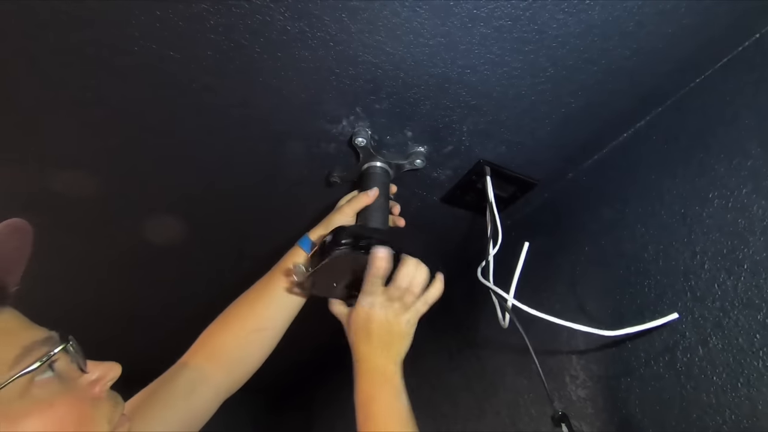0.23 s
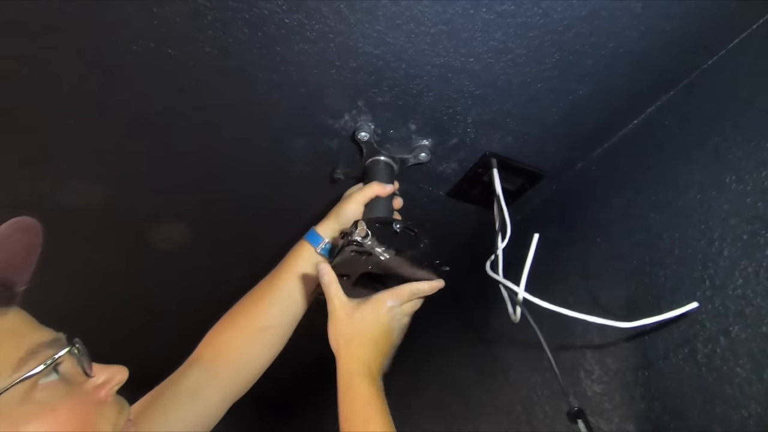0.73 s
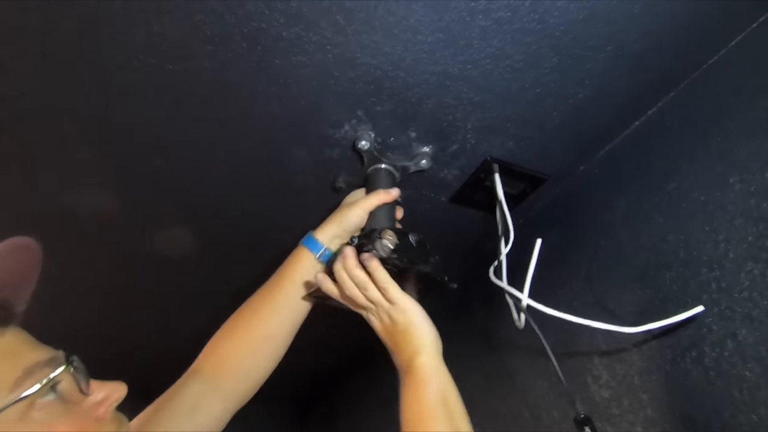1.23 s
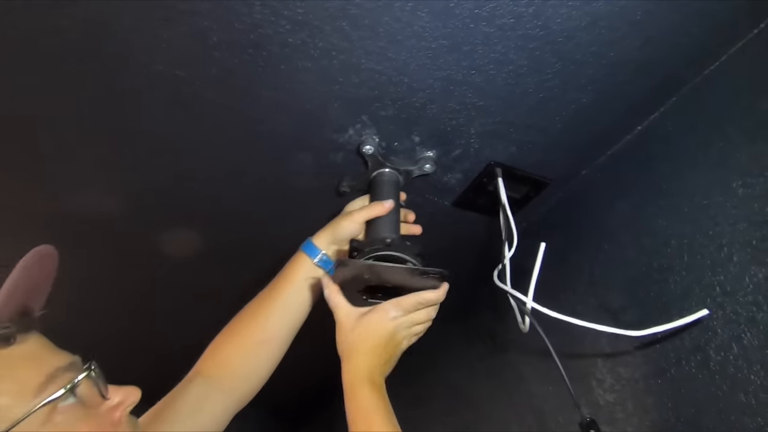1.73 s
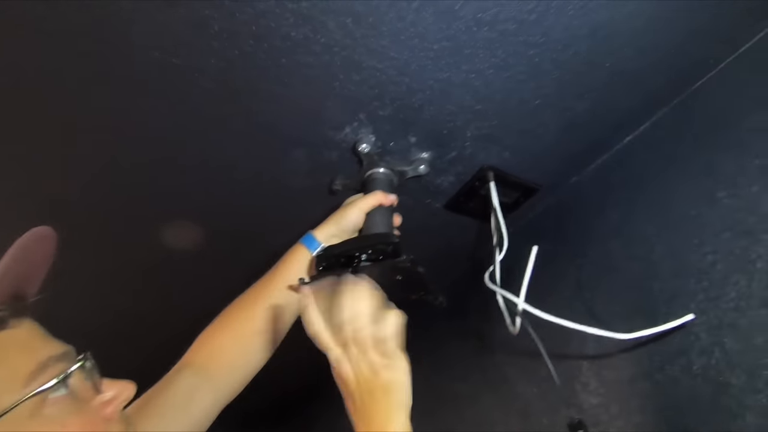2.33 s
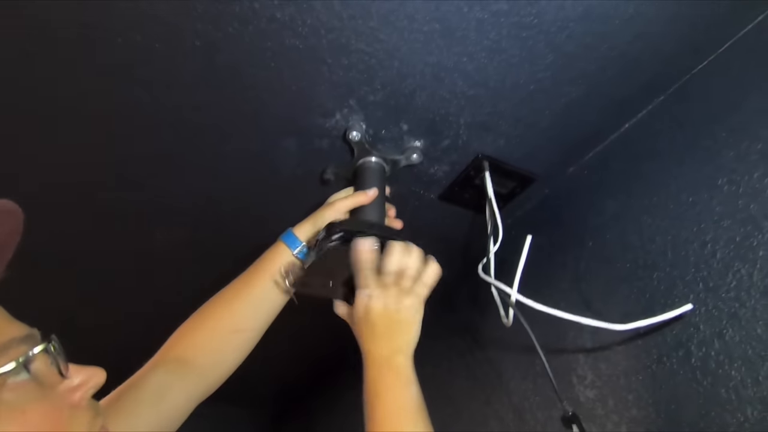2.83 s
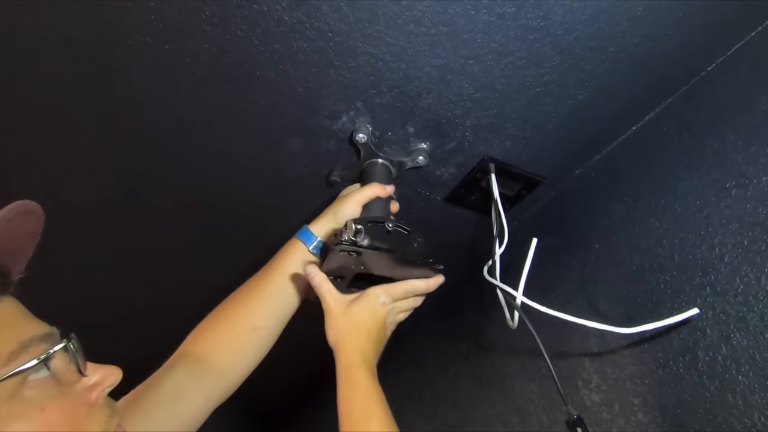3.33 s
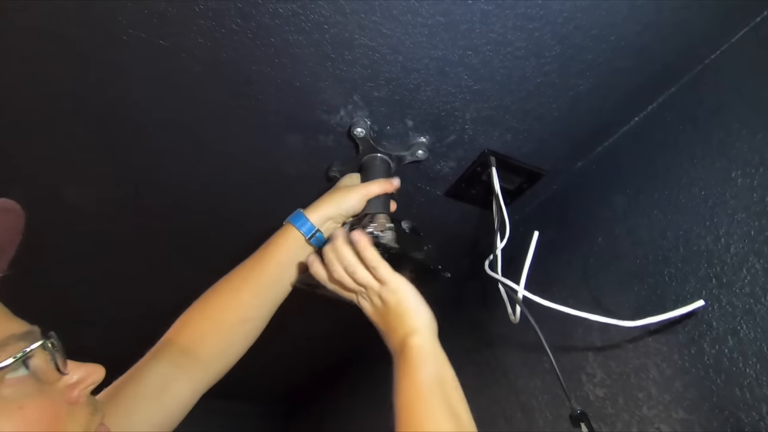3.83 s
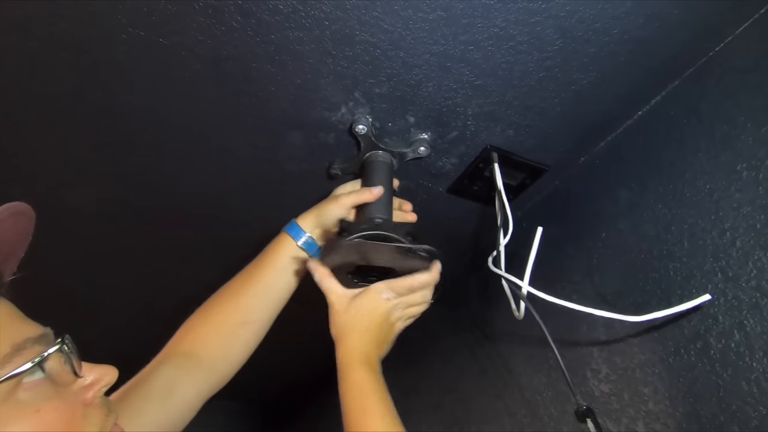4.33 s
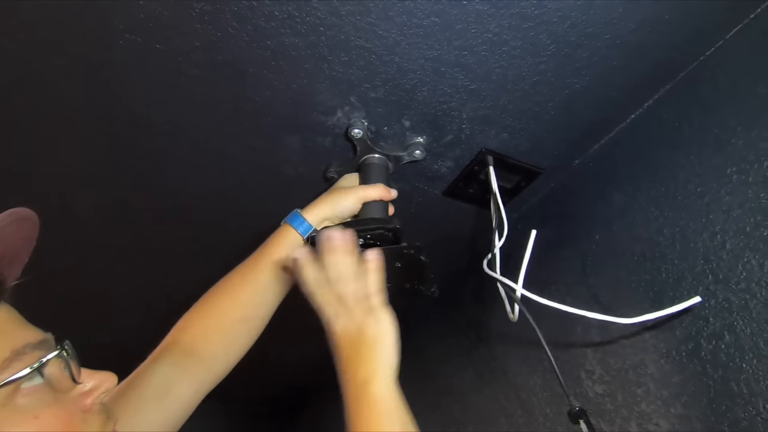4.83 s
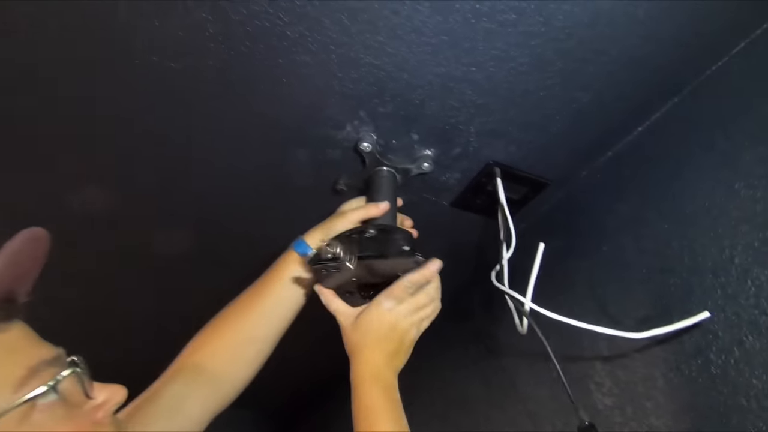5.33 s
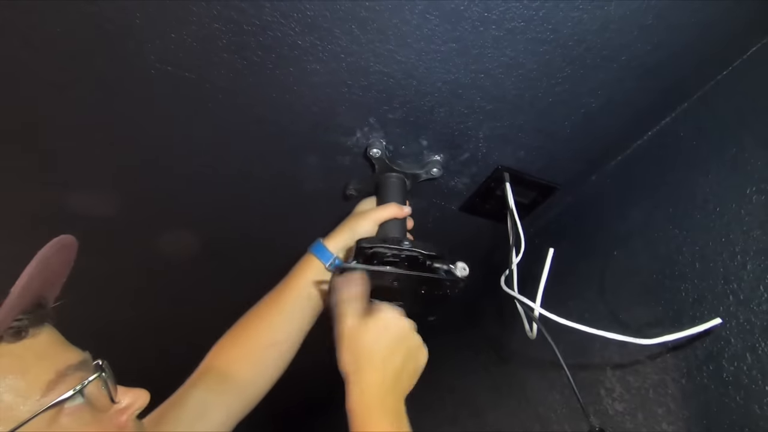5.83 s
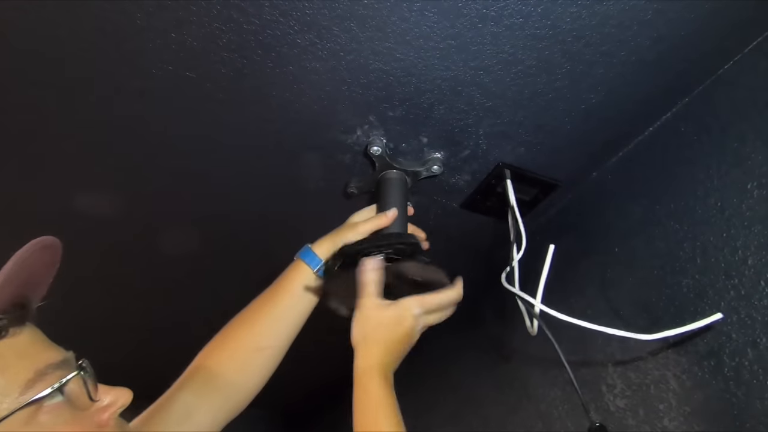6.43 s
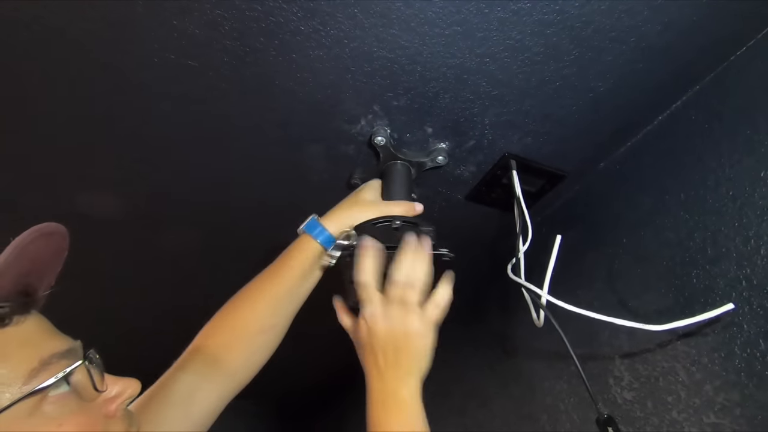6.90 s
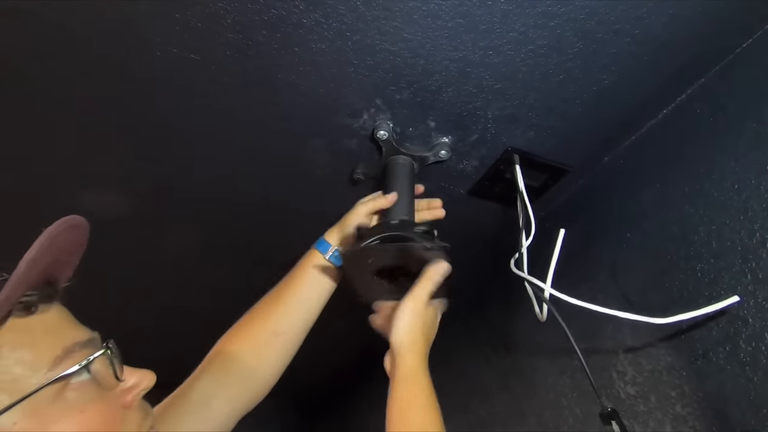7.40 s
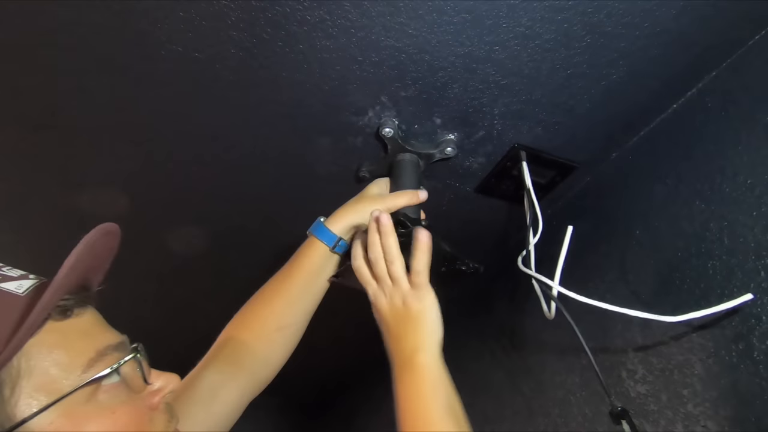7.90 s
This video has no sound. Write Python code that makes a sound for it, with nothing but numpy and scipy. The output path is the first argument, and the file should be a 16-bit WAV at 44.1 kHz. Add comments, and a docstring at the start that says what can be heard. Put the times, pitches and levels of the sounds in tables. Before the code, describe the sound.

Metal hardware is screwed on overhead by hand: sharp clacks, gritty thread grinding, dull ceiling thumps and thin tinkles over soft hiss and rumble.

```python
"""A small quiet room: hands turn a steel bracket on the thread of a pole under a ceiling plate.
The loose joint clicks and knocks: short bursts of noise ring the bracket's resonances.
Two small loose steel parts chime as fading sines. The thread slips in uneven jerks, which grind in
the bracket and boom in the ceiling; hands scrape on steel. Soft pushes thud in the ceiling.
Random echoes, a steady hiss and a deep, lumpy rumble surround it all."""
import sys
import numpy as np
from scipy import signal
from scipy.fft import rfft, irfft
from scipy.io import wavfile
from scipy.ndimage import uniform_filter1d

SR = 44100
rng = np.random.default_rng(int(sys.argv[2]) if len(sys.argv) > 2 else 0)


def digitize_waveform(pressure):
    """Quantize a signal to 16-bit integers and store it at the path in sys.argv[1].

    Rows of a 2-D input are taken as channels; values are limited to [-1, 1].
    """
    field = np.atleast_2d(pressure).T
    bounded = np.clip(field, -1, 1)
    quanta = np.round(bounded * 32767).astype(np.int16)
    wavfile.write(sys.argv[1], SR, quanta)


def nominal_scale(level):
    """Amplitude ratio for a level in decibels (scalar or array-like)."""
    x = np.asarray(level, float) / 20
    return 10 ** x


N = 359856  # length in samples, 8.16 s


def evened(x):
    """Scales to rms 1."""
    return x / np.sqrt(np.mean(x ** 2) + 1e-20)


def peaked(x, db):
    """Scales the peak to db."""
    return nominal_scale(db) * x / abs(x).max()


def read(points, hz):
    """Reads a table at any frequency, on a log-frequency axis."""
    f, value = np.transpose(points)
    return np.interp(np.log(hz + 1), np.log(f + 1), value)


def add(mix, s, sound):
    """Mixes a sound in at time s."""
    part = mix[round(s * SR):][:len(sound)]
    part += sound[:len(part)]


def band(x, lo_hz, hi_hz, order=2):
    """Keeps only the tones between two frequencies."""
    return signal.sosfilt(signal.butter(order, [lo_hz, hi_hz], "bandpass", fs=SR, output="sos"), x)


def resonate(x, hz, width):
    """Two-pole resonance: favours tones near hz, with gain 1 at its centre."""
    r = np.exp(-np.pi * width / SR)
    return signal.lfilter([(1 - r * r) / 2, 0, (r * r - 1) / 2],
                          [1, -2 * r * np.cos(2 * np.pi * hz / SR), r * r], x)


def body(x, modes):
    """A solid thing rings at several pitches at once: a sum of resonances."""
    return sum(nominal_scale(db) * resonate(x, hz, width) for hz, width, db in modes)


# colour of the hiss: f/Hz, relative level per Hz/dB
HISS_COLOUR = [(35, -36), (60, -48), (85, -6), (168, -0.5), (553, 0.5), (882, -5), (1470, -11.5),
               (1740, -11), (4530, -19), (11800, -58), (16000, -57)]
# colour of the deep rumble: f/Hz, relative level per Hz/dB
RUMBLE_COLOUR = [(2, 0), (8, -5), (20, -9), (40, -20), (55, -23), (70, -32), (100, -60)]
# loudness of the deep rumble over time: t/s, level/dB
RUMBLE_LEVEL = [(0.0, -31), (0.23, -33), (0.25, -32), (2.23, -32), (2.34, -25.5), (2.41, -32.5),
                (4.79, -38), (5.16, -37), (5.2, -27), (5.36, -32), (5.45, -35.5), (7.91, -36), (8.07, -35),
                (8.16, -47)]


def quiet():
    """Steady hiss of room and microphone over a deep, lumpy rumble; both are coloured noise."""
    hz = np.fft.rfftfreq(N, 1 / SR)
    colours = nominal_scale([read(HISS_COLOUR, hz), read(RUMBLE_COLOUR, hz)])
    hiss, rumble = irfft(rfft(rng.standard_normal((2, N))) * colours, N)
    rumble_db = np.interp(np.arange(N) / SR, *np.transpose(RUMBLE_LEVEL))
    return nominal_scale(-43.5) * evened(hiss) + nominal_scale(rumble_db) * evened(rumble)


# how long echoes take to fade by 60 dB: f/Hz, t60/s
ECHO_FADE = [(120, 0.19), (330, 0.5), (870, 0.39), (2300, 0.57), (6060, 0.49), (16000, 0.22)]


def room(x):
    """Scattered random echoes, each band dying at its own speed, in three tails taken in turn."""
    out = np.zeros(N)
    turn = np.arange(N) / SR * 2.3
    for k in range(3):
        echoes = rng.standard_normal(SR) * (rng.random(SR) < 0.12)
        hz, t, z = signal.stft(echoes, SR, nperseg=256)
        fade = nominal_scale(-60 * t / read(ECHO_FADE, hz)[:, None])
        tail = signal.istft(z * fade, SR, nperseg=256)[1]
        tail = tail * np.clip((np.arange(len(tail)) / SR - 0.003) / 0.023, 0, 1)  # echoes build up
        share = np.cos(np.pi * (turn + k / 3))
        out += signal.oaconvolve(x * share, tail / np.linalg.norm(tail))[:N]
    return out * np.sqrt(2 / 3)


# resonances of the ceiling boards: f/Hz, width/Hz, relative level/dB
CEILING_MODES = [(132, 19, 2), (149, 43, 2.5), (172.4, 14, 0), (201, 49, 1.5), (220, 67, -15),
                 (261, 49, -2.5), (308.3, 54, -0.5), (413.5, 6, 6), (494.8, 7.6, 5.5)]


def ceiling(x):
    """The ceiling boards boom at their own low pitches when shaken by x."""
    return body(x, CEILING_MODES)


# dull knocks into the ceiling: t/s, peak level/dB, f/Hz
SOFT_PUSHES = [(0.044, -19.5, 133), (0.18, -27, 323), (0.316, -24, 122), (0.8, -19.5, 203),
               (1.073, -27, 182), (1.134, -25.5, 150), (1.422, -18, 343), (1.48, -13, 329),
               (1.606, -23, 353), (1.917, -26, 157), (2.734, -26, 175), (2.805, -11.5, 172),
               (2.909, -18.5, 192), (3.391, -27, 308), (3.696, -28, 180), (3.94, -11.5, 266),
               (4.006, -22, 268), (4.061, -20.5, 287), (4.427, -21.5, 160), (5.154, -9.5, 193),
               (5.524, -17, 322), (5.735, -26, 129), (6.173, -27.5, 135), (6.411, -18, 197),
               (6.708, -29, 154), (7.037, -41, 194), (7.249, -25, 188), (7.308, -29, 142),
               (7.362, -14.5, 154), (7.618, -23, 187)]


def thuds():
    """A soft push rings the ceiling near one pitch."""
    out, t = np.zeros(N), np.arange(8192) / SR
    t60 = 0.061  # s
    swell_and_fade = nominal_scale(-60 * t / t60) * np.minimum(t / 0.005, 1)
    for s, db, hz in SOFT_PUSHES:
        ring = np.sin(2 * np.pi * hz * t) * swell_and_fade
        add(out, s, peaked(ring + 5.0 * ceiling(ring), db))
    return out


# resonances of the bracket: f/Hz, width/Hz, relative level/dB
BRACKET_MODES = [(475, 79, 3.5), (711, 160, 6.5), (875, 160, 5), (1005, 51, -0.5), (1197, 210, -4),
                 (1750, 590, -1.5), (1900, 56, -15), (2290, 86, 3.5), (2477, 47, -0.5), (2680, 100, -21),
                 (3660, 93, 5), (4225, 760, -3), (4510, 31, -8), (4850, 82, -3), (5100, 100, -1),
                 (5500, 80, -0.5), (5890, 400, -14), (7630, 64, 3), (7870, 18, 6), (8400, 40, -27)]


def bracket(x, shift=0, lift_db=0):
    """The steel bracket rings when shaken by x; a grip can shift and lift or lower each resonance."""
    hz, width, db = np.transpose(BRACKET_MODES)
    return body(x, np.transpose([hz * (1 + shift), width, db + lift_db]))


# twists of the hand: t/s of the strongest push, length/s, then the levels at that push:
# boom of the ceiling level/dB, grind of the thread level/dB, scrape of the hands level/dB
HAND_TWISTS = [(-0, 0.11, -27, -30, -32.5), (0.218, 0.26, -37, -52, -32), (0.32, 0.44, -29.5, -39.5, -48),
               (0.507, 0.23, -40, -42, -47), (0.72, 0.13, -38.5, -53, -43), (0.822, 0.091, -29, -57, -41),
               (1.116, 0.14, -35.5, -32.5, -62), (1.398, 0.63, -27, -36.5, -58),
               (1.545, 0.23, -26, -35.5, -58), (1.93, 0.22, -27.5, -35, -44), (2.147, 0.066, -27, -30, -55),
               (2.36, 0.54, -46.5, -66, -61), (2.836, 0.15, -15, -28.5, -58), (2.933, 0.11, -31, -38, -37),
               (3.103, 0.44, -32.5, -35, -52), (3.45, 0.57, -36.5, -33.5, -60),
               (3.715, 0.097, -47, -27, -67), (3.95, 0.3, -20, -31, -43), (4.088, 0.094, -21.5, -29, -46),
               (4.28, 0.31, -29, -35.5, -56), (4.427, 0.43, -34, -40, -49), (4.754, 1, -38, -40.5, -58),
               (4.983, .2, -31, -47, -65), (5.185, 0.33, -21, -24.5, -39),
               (5.502, 0.24, -21.5, -27.5, -34.5), (5.737, 0.26, -31.5, -46, -36),
               (5.839, .16, -25.5, -29, -59), (6.177, 0.33, -29, -31.5, -40), (6.346, 0.26, -30, -32, -50),
               (6.438, .2, -23, -31.5, -54), (6.543, 0.084, -30, -55, -36), (6.747, 0.37, -26.5, -42, -47),
               (6.827, .2, -25, -43, -55), (7.08, 0.2, -28.5, -37, -50), (7.25, 0.3, -25.5, -31, -47),
               (7.4, 0.24, -29.5, -36, -51), (7.63, .08, -30, -26.5, -53), (7.748, 0.14, -33.5, -31.5, -39),
               (8.0, 0.91, -43, -56, -45)]


def twisting():
    """Boom, grind and scrape gains: each twist swells to its push and slackens more slowly."""
    t, power = np.arange(0, N + 64, 64) / SR, 0
    rise_share, ends_db = 0.37, -16.5  # part of a twist before its push; level at both ends against the push
    for s, length, *db in HAND_TWISTS:
        away = np.where(t < s, (s - t) / rise_share, (t - s) / (1 - rise_share)) / max(length, 0.02)
        power = power + nominal_scale(np.array(db)[:, None] + ends_db * away) ** 2
    return [np.interp(np.arange(N) / SR, t, row) for row in np.sqrt(power)]


def slips(spread_db):
    """Stick-slip: the thread sticks, then jumps, giving impulses of uneven size at chance times."""
    slips_per_s = 400
    size = nominal_scale(spread_db * np.minimum(rng.exponential(1, N), 4)) * rng.choice([-1, 1], N)
    return size * (rng.random(N) < slips_per_s / SR)


def turning():
    """Slips of the thread shake the ceiling and the bracket; hands rub on steel."""
    booming, grinding, scraping = twisting()
    shaking = evened(slips(3.9)) + 0.55 * rng.standard_normal(N)
    boom = evened(band(ceiling(shaking), 117, 522)) * booming
    grind = evened(band(bracket(slips(2.2)), 310, 1700)) * grinding
    rub = rng.standard_normal(N) + 0.16 * evened(slips(8.5))
    scrape = evened(band(bracket(rub) + 0.5 * rub, 1470, 10000, order=1)) * scraping
    return boom, grind + scrape


def chime(pitches, modes, blows):
    """Where a blow lands sets how strongly each mode rings; the part swings, so each mode wavers."""
    out, t = np.zeros((len(modes), N)), np.arange(SR // 2) / SR
    hz, (own_db, t60) = np.array(pitches)[:, None], np.transpose(modes)[:, :, None]
    free_s, choke_db_per_s = 0.17, -500  # a part rings freely, then falls back against the bracket
    choke = nominal_scale(choke_db_per_s * np.maximum(t - free_s, 0))
    envelope = choke * np.minimum(t / 0.00062, 1)
    chances = rng.random((len(blows), 2, len(modes), 1))
    for (s, db, spot_hz, fall_db), (phase, chance) in zip(blows, chances):
        off_spot_db = abs(fall_db * np.log2(hz / spot_hz))
        mode_db = db + own_db - off_spot_db + 2 * (2 * chance - 1)  # up to 2 dB either way by chance
        ring = nominal_scale(mode_db - 60 * t / t60) * np.sin(2 * np.pi * (hz * t + phase))
        neighbour_hz = hz * (1.3 + 0.079 * phase)  # a weak, brief neighbour
        ring += 0.2 * nominal_scale(mode_db - 110 * t / t60) * np.sin(2 * np.pi * neighbour_hz * t)
        add(out.T, s, (ring * envelope).T)
    slow = uniform_filter1d(rng.standard_normal(out.shape), size=350)
    swing = evened(uniform_filter1d(slow, size=350))
    return (out * nominal_scale(3 * np.clip(swing, -3, 0.7))).sum(0)


# pitches of the pin's modes: f/Hz
PIN_PITCHES = [3636, 9511, 11467, 11606, 15200]
# how each of those modes rings: relative level/dB, t60/s
PIN_MODES = [(2, .5), (2.5, 0.31), (-1, 0.25), (-1, .26), (3, .25)]
# blows on the pin: t/s, level/dB before each mode's own, favoured f/Hz, fall away from there/dB per octave
PIN_HITS = [(0.149, -39, 9000, 8), (0.181, -30, 9900, 15), (0.308, -45, 9500, 30), (0.41, -46, 3640, 9),
            (0.46, -38, 12100, 30), (0.71, -41, 9300, 28), (2.103, -34, 3640, 30), (3.031, -20, 11600, 57),
            (3.031, -36, 3640, 27), (3.068, -34, 14400, 27), (3.342, -31, 9300, 28),
            (3.349, -31, 10400, 17), (3.375, -40, 15200, 60), (4.565, -47, 9300, 25),
            (5.399, -32, 9000, 28), (5.517, -37, 3640, 11), (5.604, -29.5, 11300, 15),
            (5.623, -25.5, 10400, 22), (5.824, -35, 11800, 70), (5.88, -44, 13000, 25),
            (6.115, -38, 3640, 30), (6.145, -39.5, 3640, 4), (6.476, -43, 9500, 20),
            (6.524, -28, 15200, 28), (6.524, -40, 3640, 28), (6.545, -29, 9500, 40), (6.721, -45, 9300, 40),
            (6.93, -40, 9900, 30), (7.031, -43, 9000, 26), (7.139, -38, 11900, 70), (7.328, -48, 10200, 25),
            (7.946, -33, 9400, 29), (8.09, -53, 9600, 40)]


def pin():
    """A small loose steel part is struck and rings at its own pitches."""
    return chime(PIN_PITCHES, PIN_MODES, PIN_HITS)


# pitches of the washer's modes: f/Hz
WASHER_PITCHES = [4052, 5843, 6659, 9636, 12575]
# how each of those modes rings: relative level/dB, t60/s
WASHER_MODES = [(4, 0.2), (1.5, 0.37), (-0.5, 0.64), (0.5, 0.27), (0, 0.19)]
# blows on the washer: t/s, level/dB before each mode's own, favoured f/Hz, fall away from there/dB per octave
WASHER_HITS = [(0.41, -49, 7000, 40), (0.461, -36, 10200, 50), (1.172, -44, 9600, 22),
               (2.332, -43, 6660, 40), (2.592, -41, 8600, 25), (2.628, -34, 8340, 39),
               (2.793, -31, 9600, 27), (3.03, -34, 13600, 40), (4.219, -53, 9600, 30),
               (4.565, -46, 6760, 50), (5.031, -49, 6660, 40), (5.4, -29, 8800, 25),
               (5.515, -26.5, 4050, 23), (5.601, -40, 4050, 30), (6.177, -32, 4050, 19),
               (6.52, -30, 5900, 5), (6.543, -25, 9600, 19), (6.577, -28.5, 6600, 19),
               (6.602, -34, 7400, 30), (6.721, -32, 9600, 54), (6.928, -40, 6800, 55),
               (7.031, -67, 6600, 44), (7.328, -50, 4050, 40), (7.595, -45, 6900, 40),
               (7.718, -35, 6750, 45)]


def washer():
    """A second small loose steel part rings at other pitches."""
    return chime(WASHER_PITCHES, WASHER_MODES, WASHER_HITS)


def strike(direct, feed, s, db, room_db, rattle, colour):
    """Nearby one hears the uneven rattle; the room, all around, gets plain colour and the rattle in about equal
    parts, of like energy."""
    rattle = rattle + 4.9 * signal.unit_impulse(len(rattle), idx=30)  # the first contact is the hardest
    near = peaked(colour(rattle), db)
    plain = evened(colour(signal.unit_impulse(len(rattle)))) + 1.04 * evened(near)
    add(direct, s, near)
    add(feed, s, nominal_scale(room_db) * plain * np.linalg.norm(near) / np.linalg.norm(plain))


# knocks that ring the bracket: t/s, peak level/dB, f/Hz
BRACKET_KNOCKS = [(0.031, -22, 840), (0.18, -15, 705), (0.288, -22.5, 650), (0.363, -20.5, 690),
                  (0.713, -16.5, 780), (0.738, -18, 786), (0.801, -19.5, 708), (1.056, -26, 780),
                  (1.376, -28, 880), (1.515, -15.5, 1030), (1.694, -19.5, 729), (2.123, -9.5, 780),
                  (2.351, -28, 684), (2.416, -22, 866), (2.733, -22, 1020), (2.781, -29, 807),
                  (2.8, -16, 748), (2.815, -18, 734), (2.849, -16, 650), (3.049, -24, 1090),
                  (3.121, -25, 746), (3.374, -25, 756), (3.392, -14, 1060), (3.702, -20.5, 1030),
                  (3.881, -19, 1020), (3.937, -16.5, 1030), (3.954, -15, 870), (4.565, -19.5, 764),
                  (4.635, -20, 934), (4.72, -15, 891), (4.79, -21.5, 875), (4.841, -20.5, 875),
                  (4.948, -20, 890), (5.047, -22, 816), (5.151, -4.5, 714), (5.517, -14, 746),
                  (5.688, -14, 1040), (5.734, -15, 990), (5.762, -17, 966), (5.791, -29, 859),
                  (5.832, -12, 886), (6.043, -27, 980), (6.105, -17.5, 1000), (6.178, -9.5, 1030),
                  (6.313, -27, 748), (6.675, -13, 814), (6.882, -25, 708), (7.035, -20, 1070),
                  (7.119, -22, 674), (7.269, -19.5, 1050), (7.328, -17.5, 920), (7.614, -25, 829),
                  (7.722, -20.5, 710), (7.764, -20, 850), (7.942, -21, 890), (8.091, -25.5, 680)]


def knocks(direct, feed):
    """A knock is a short rattle that rings the bracket and one low pitch."""
    t = np.arange(4096) / SR
    t60, room_db = 0.084, -8  # s; echo feed against the knock
    fall = nominal_scale(-60 * t / t60) * np.minimum(t / 0.00045, 1)
    for s, db, hz in BRACKET_KNOCKS:
        strike(direct, feed, s, db, room_db, rng.standard_normal(4096) * fall,
               lambda x: band(0.5 * bracket(x) + resonate(x, hz, 100), 327, 2050))


def ticks():
    """Click rows for faint ticks, scattered evenly by chance and louder under a strong grind."""
    per_s, base_db, spread_db, edge_db, room_db = 5, -31, 3, -15, -4
    lo_hz, hi_hz = 1600, 4560
    when, size, pitch = rng.random((80, 3)).T
    times = (np.arange(80) + when) / per_s
    grind_db = 20 * np.log10(twisting()[1] + 1e-6)
    usual_db = np.median(grind_db)
    rows = []
    for s, b, c in zip(times, size, pitch):
        if s * SR < N:
            louder_db = 0.34 * (grind_db[int(s * SR)] - usual_db)
            db = base_db - spread_db * np.log(b + 0.01) + louder_db
            rows.append((s, db, lo_hz * (hi_hz / lo_hz) ** c, edge_db, room_db))
    return rows


# clicks of the loose joint: t/s, peak level/dB, centre f/Hz,
# bright edge level/dB against the click, echo feed level/dB against the direct sound
JOINT_CLICKS = [(0.0216, -13, 4450, -14, -7), (0.1491, -22, 3650, -14, -16),
                (0.1805, -14.5, 3640, 1.5, -18), (0.1927, -15, 1740, -7, -12), (0.25, -20, 2590, -5, -6),
                (0.309, -11.5, 4020, -14, -10), (0.3645, -26, 1710, -27, -10), (0.41, -25, 4860, -18, -2),
                (0.4294, -23, 3650, -3, -4), (0.4594, -10.5, 5630, -2, -7.5), (0.7115, -8, 2210, -14.5, -6),
                (0.9925, -20.5, 5570, -31, -10), (1.056, -15, 2215, -18, -7), (1.0955, -23, 2450, -26, -10),
                (1.1734, -27.5, 2430, -15, -2.5), (1.513, -17.5, 3980, -19, -7.5),
                (1.6547, -24, 2270, -13, -3), (1.6923, -9.5, 4900, -10.5, -6.5),
                (1.7626, -21, 5100, -27, -8), (1.8875, -20.5, 5640, -20, -10), (1.9058, -25, 1900, -27, -5),
                (2.0008, -15, 4510, -21, -6.5), (2.1028, -21, 3650, -2, -3), (2.123, -2, 4670, -7, -8),
                (2.3316, -27.5, 1910, -2.5, -10), (2.5068, -20.5, 2290, -40, -9.5),
                (2.6276, -26, 5890, -9, -4), (2.7613, -18, 3920, -20, -7), (2.7918, -23.5, 3660, 7, -10),
                (2.8149, -7, 1710, -5.5, -6), (3.027, -16.5, 3660, -9, -9), (3.049, -23, 2460, -3, -5),
                (3.0649, -14.5, 2340, -15, -5.5), (3.267, -21, 4380, -29, -10.5),
                (3.3503, -13, 4670, -6.5, -6), (3.3738, -16, 2260, -11, -6),
                (3.3902, -10.5, 2290, -9, -6.5), (3.4854, -24, 3680, -11, -13), (3.696, -20, 2320, -19, -4),
                (3.706, -14.5, 1730, -19, -11), (3.8816, -27.5, 1750, -18, 5),
                (3.9244, -14.5, 5980, -8.5, -8), (3.9528, -17, 1630, -26, -8),
                (4.0926, -17.5, 2400, -28, -5), (4.128, -18, 4280, -29, -4), (4.2194, -28, 4720, -7, -6),
                (4.5638, -8, 3530, -11.5, -8), (4.7192, -27, 2440, -27, -5),
                (4.7374, -23.5, 1970, -27, -13), (4.8394, -35, 2450, -28, -9),
                (4.8998, -25, 2400, -29, -10), (4.9417, -34.5, 1590, -29, -8),
                (4.9846, -21.5, 2210, -26, -7), (5.03, -25, 2450, -11, -5), (5.0799, -29, 1720, -22, -14),
                (5.1517, -12, 1510, -13, -19), (5.1606, -5, 2090, -11, -10),
                (5.1658, -1.5, 4000, -12, -6.5), (5.3665, -12.5, 2290, -12, -6.5),
                (5.4004, -14, 2440, -1.5, -9), (5.5188, -8, 4130, -9.5, -5.5),
                (5.603, -11.5, 5310, -14, -6), (5.6208, -17, 4050, -11, -9), (5.673, -13, 2250, -12, -14),
                (5.7144, -16.5, 4310, -15, -2.5), (5.7346, -16.5, 1720, -23, -8),
                (5.7902, -15, 4050, -19, -4), (5.825, -12, 4760, -14, -8), (5.8349, -12, 1680, -7, -7.5),
                (5.8806, -18, 2430, -9, -5.5), (6.1155, -21, 3660, -18, -6), (6.1754, -14, 2400, -14, -7.5),
                (6.3669, -22.5, 2290, -16, -5), (6.5241, -25, 5860, -10, -12), (6.5483, -16, 5940, 2, -8),
                (6.678, -18, 1750, -26, -1), (6.696, -15, 4020, -12, -15),
                (6.7229, -5.5, 2290, -11.5, -8.5), (6.9292, -16, 4020, -23, -7.5),
                (7.0312, -19.5, 2280, -16, -6.5), (7.1408, -19, 3650, -7, -7),
                (7.2602, -18, 2450, -15, -5.5), (7.3272, -22.5, 2280, -22, -8),
                (7.4594, -5.5, 4160, -18, -8.5), (7.467, -15.5, 4230, -22, -5.5),
                (7.5423, -25, 4630, -2, -6), (7.5949, -18.5, 5080, -13, -3), (7.7211, -11, 3840, -7.5, -12),
                (7.7644, -22, 1980, -25, -4), (7.9375, -18.5, 4730, -1, -17), (7.945, -9.5, 4150, -9, -8.5),
                (8.09, -17, 2750, -24, -6)]


def clicks(direct, feed):
    """A click is a short rattle coloured by the bracket, with a bright edge on top."""
    t = np.arange(4096) / SR
    t60, edge_share = 0.049, 1.53  # s; length of the edge as a share of the click
    fall = nominal_scale(-60 * t / t60) * np.minimum(t / 0.00045, 1)
    edge_fall = fall ** (1 / edge_share) * np.minimum(t / 0.00076, 1)  # the edge swells a little later
    for s, db, hz, edge_db, room_db in list(JOINT_CLICKS) + ticks():
        # each new grip shifts the resonances by up to 3 % and lifts or lowers them by up to 5 dB
        chance = rng.uniform(-1, 1, (2, len(BRACKET_MODES)))
        grip = 0.03 * chance[0], 5 * chance[1]
        a, b = rng.standard_normal((2, 4096))
        strike(direct, feed, s, db, room_db, a * fall,
               lambda x: band(0.49 * bracket(x, *grip) + 0.89 * resonate(x, hz, 0.25 * hz) + 0.56 * x,
                              1570, 6740))
        strike(direct, feed, s, db + edge_db, room_db, b * edge_fall,
               lambda x: band(x + bracket(x, *grip), 7560, 12470))


def scene():
    """All sources, their echoes and the background."""
    background, thud, (boom, rub), ring = quiet(), thuds(), turning(), pin() + washer()
    direct, feed = np.zeros(N), np.zeros(N)
    knocks(direct, feed)
    clicks(direct, feed)
    # each source sends its own share to the echoes; clicks and knocks are all lifted by 3 dB
    echoes = room(nominal_scale(3.0) * feed + nominal_scale(-15.0) * ring + nominal_scale(-8.5) * thud
                  + nominal_scale(-10.5) * boom + nominal_scale(-6.0) * rub)
    return (direct + ring + thud + boom + rub + echoes + background)[None]


def top_cut(x):
    """Nothing passes above the cut-off."""
    return signal.sosfilt(signal.butter(12, 16820, fs=SR, output="sos"), x)


def record(dry):
    """Takes off the treble above 15900 Hz with a steep filter."""
    low_pass = signal.firwin(511, 15900, window=("kaiser", 9), fs=SR)
    limited = signal.oaconvolve(dry, low_pass[None], "same")
    return top_cut(limited)


dry = scene()
out = record(dry)
digitize_waveform(out)
```